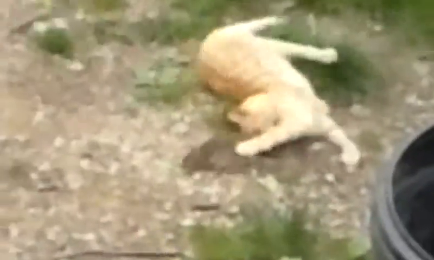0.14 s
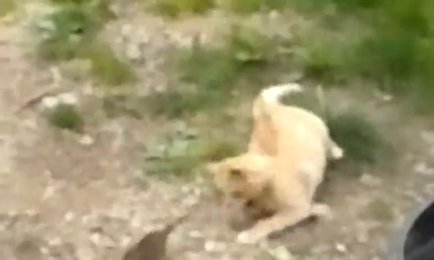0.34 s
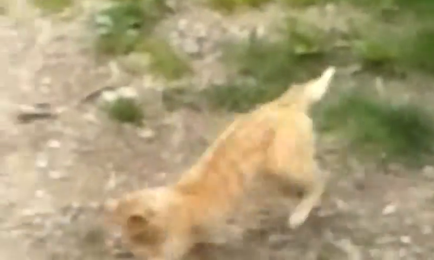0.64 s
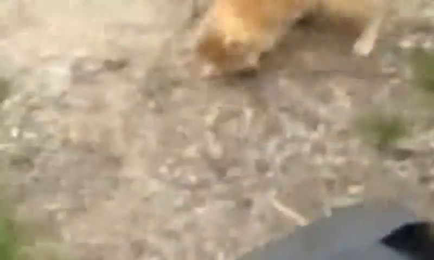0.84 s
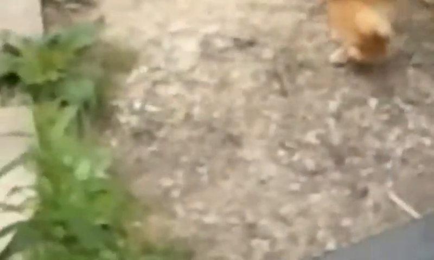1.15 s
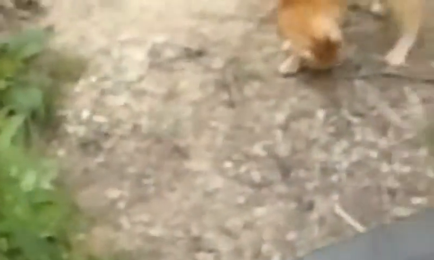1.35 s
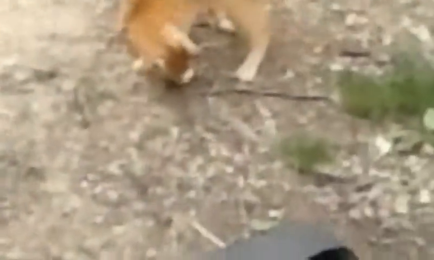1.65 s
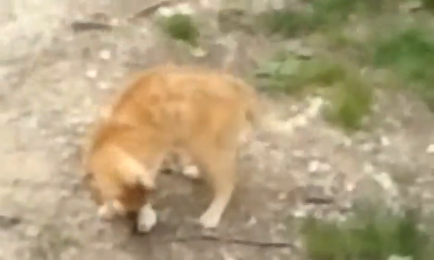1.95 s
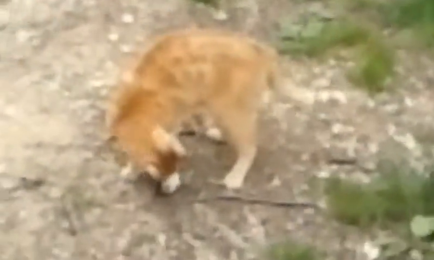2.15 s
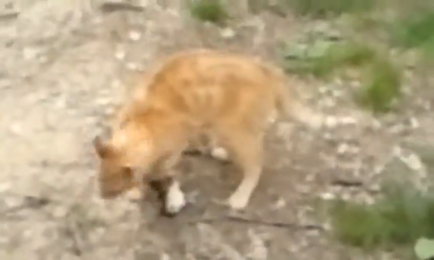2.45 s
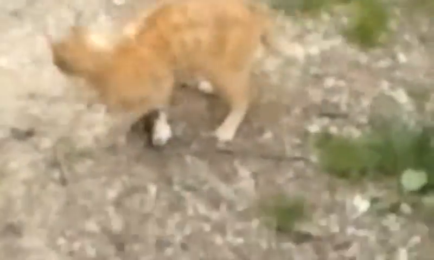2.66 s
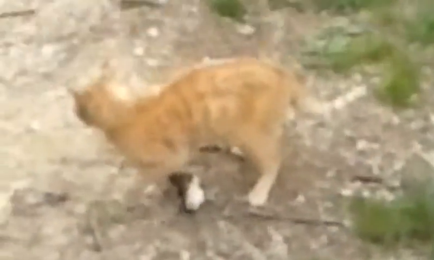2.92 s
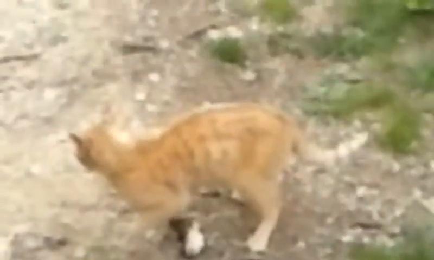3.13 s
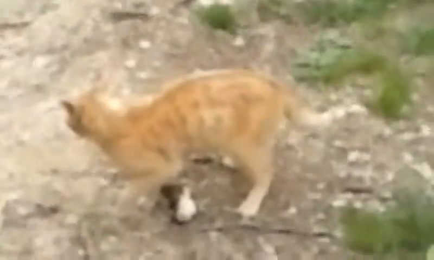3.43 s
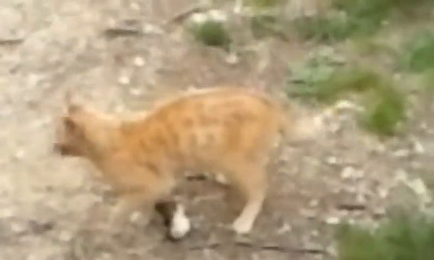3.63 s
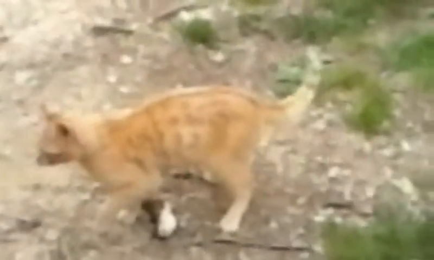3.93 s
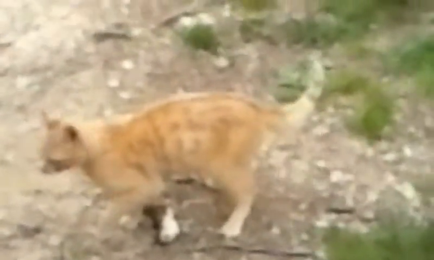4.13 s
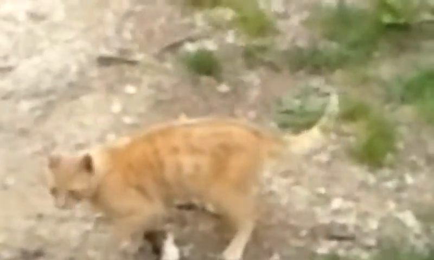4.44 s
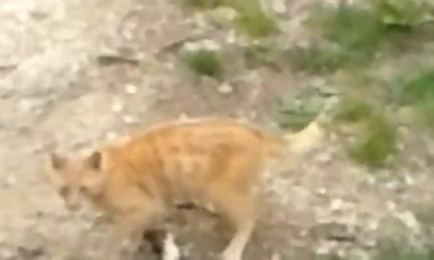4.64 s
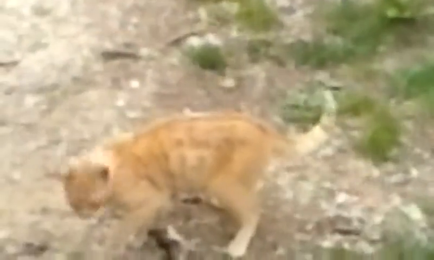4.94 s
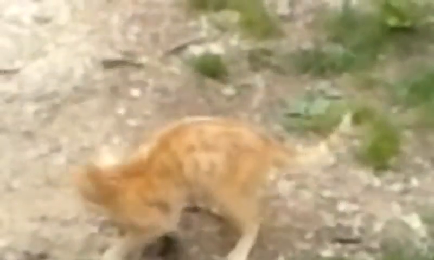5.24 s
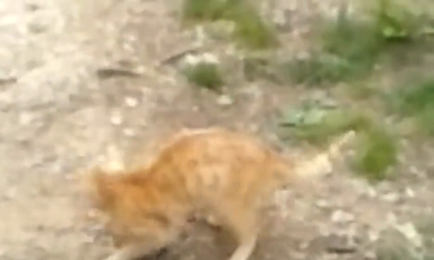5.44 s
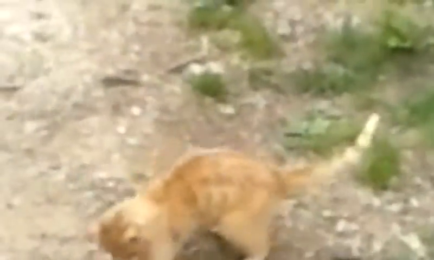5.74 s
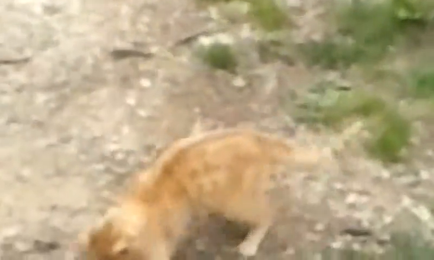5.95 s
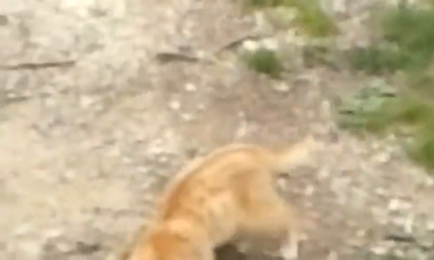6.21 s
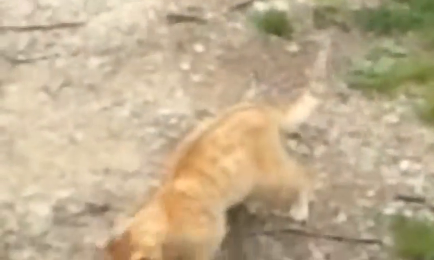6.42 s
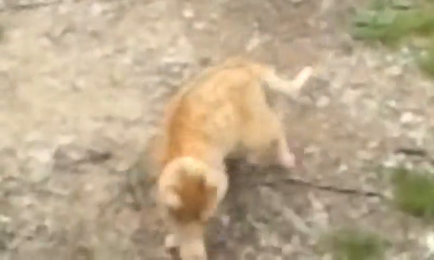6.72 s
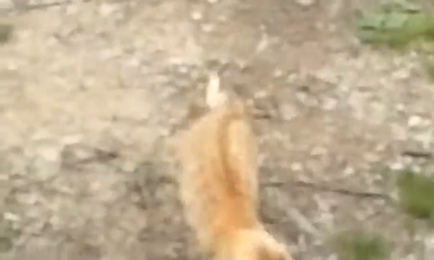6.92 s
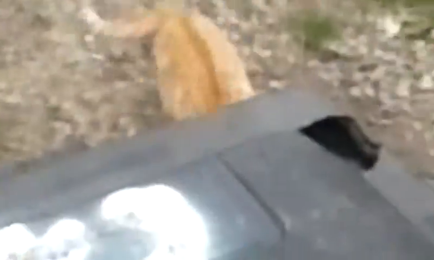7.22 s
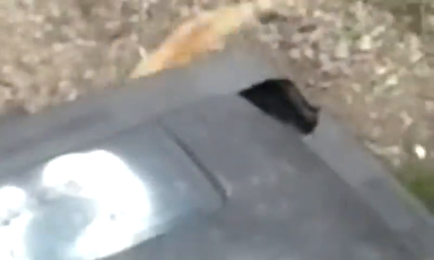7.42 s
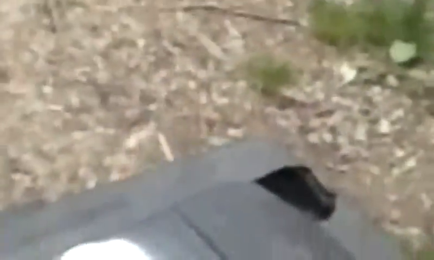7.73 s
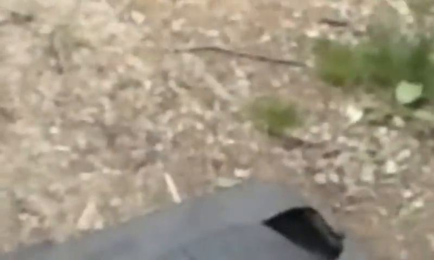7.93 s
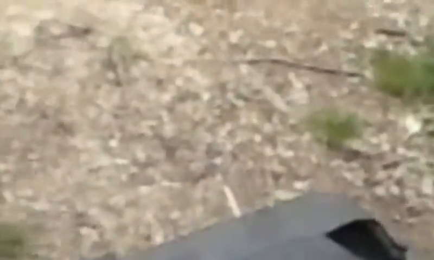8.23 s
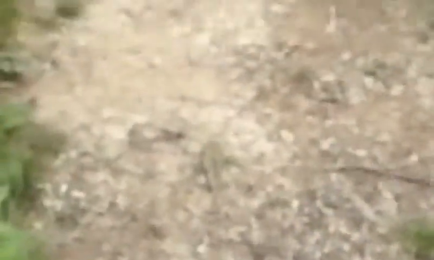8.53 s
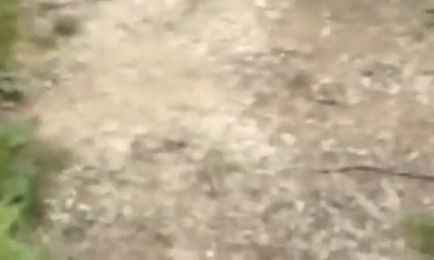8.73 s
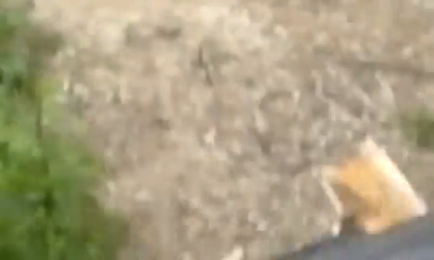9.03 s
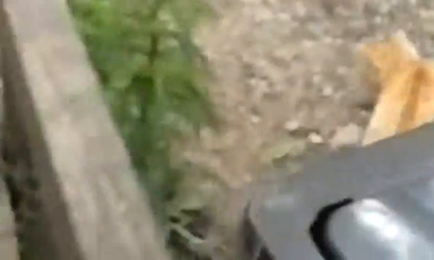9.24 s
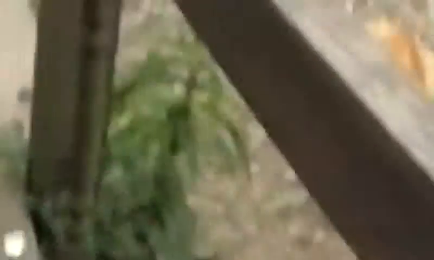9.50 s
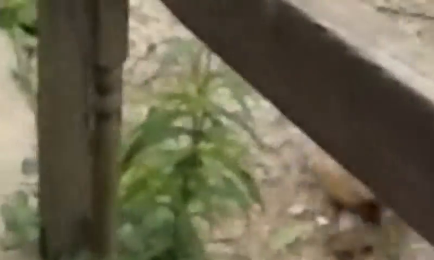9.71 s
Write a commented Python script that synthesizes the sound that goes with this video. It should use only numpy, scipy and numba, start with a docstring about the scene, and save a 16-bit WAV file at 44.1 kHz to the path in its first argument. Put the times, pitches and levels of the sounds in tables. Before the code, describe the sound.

A summer back yard heard through a hand-held phone, the same in both channels. A high, raspy insect drone around 7 kHz runs throughout, swelling and dipping, over faint leaf hiss, low rumble and far traffic hum. From 0.1 to 1.3 s short bird whistles slide mostly downward, with a thin high call at 0.6 and a soft bump. Soft rising whistles begin at 1.6, becoming fuller from 2.8 to 5 s, about six a second, with low arching whistles beneath. A small thump lands at 2.9. From 5.2 to 6 s a bright chipping trill grows loud, with a thin squeak at 5.6. Sparse hoarse and thin calls follow around 7 s, with faint rustling. Sharp clicks and a strong short thud hit near 7.5. Dry rubs come at 8.3 and 8.8, clustered knocks at 9.0-9.3 amid brief whistles, then rapid clicks near 9.5 as insects and hum continue.

```python
"""A summer back yard heard through a hand-held phone, over insects that swell and sink and a far traffic hum.
It opens with sliding bird whistles and a thin call; then rising and low arching whistles go on to about 5 s.
A swelling trill and a high squeak follow before 6 s. A bump with clicks comes near 7.5 s, more of both after 9 s,
and dry rustles now and then. Insects, rubs and wind-like washes are shaped noise; birds and hums are
sine tones with moving pitch; bumps are fading sine tones."""
import sys
import numpy as np
from scipy import signal
from scipy.fft import rfft, irfft, next_fast_len
from scipy.io import wavfile
from scipy.ndimage import uniform_filter1d
from numba import njit

SR = 44100
rng = np.random.default_rng(int(sys.argv[2]) if len(sys.argv) > 2 else 0)


def bounce(signal):
    """Save signal as a 16-bit WAV file at the path given by the first command-line argument."""
    frames = np.transpose(np.atleast_2d(signal))
    limited = np.clip(frames, -1, 1)
    pcm = np.round(limited * 32767).astype(np.int16)
    wavfile.write(sys.argv[1], SR, pcm)


N = 435266
T = np.arange(N) / SR
# Levels in the tables are starting levels: the functions add their own gains and flutter.


def undb(db):
    """Turn decibels into a multiplier."""
    return 10 ** (np.asarray(db) / 20)


def unit(x):
    """Scale to an rms of 1."""
    return x / np.sqrt(np.mean(x ** 2))


def curves(rows):
    """Join each column of a table by straight lines over time."""
    s, *columns = np.transpose(rows)
    return [np.interp(T, s, c) for c in columns]


def add(out, s, x):
    """Mix x into out, starting at s seconds."""
    i = max(int(s * SR), 0)
    out[i:i + len(x)] += x[:max(N - i, 0)]


def colour(x, points):
    """Make some pitches stronger and others weaker, following a table of (frequency [Hz], level [dB])."""
    hz, db = np.transpose(points)
    f = np.fft.rfftfreq(len(x), 1 / SR) + 1  # + 1 keeps the logarithm finite
    gain = undb(np.interp(np.log(f), np.log(hz), db))
    return irfft(rfft(x) * gain, len(x))


def walk(rate):
    """A smooth random wander of rms near 1, with about `rate` fresh random values a second."""
    k = max(int(SR / rate), 2)
    steps = np.repeat(rng.standard_normal(N // k + 1), k)
    return unit(uniform_filter1d(steps, k)[:N])


@njit
def svf(x, hz, width):
    """State-variable band-pass: two linked integrators resonate at a centre that may move."""
    y, b, l = np.empty(len(x)), 0., 0.
    for i in range(len(x)):
        g, k = np.tan(np.pi * hz[i] / SR), width / hz[i]
        v = (b + g * (x[i] - l)) / (1 + g * (g + k))
        b, l, y[i] = 2 * v - b, l + 2 * g * v, k * v
    return y


def band(x, hz, width):
    """Pass x through the same resonance twice, for steep sides; rms 1."""
    hz = np.clip(hz + np.zeros(len(x)), 20, .45 * SR)
    once = svf(x, hz, float(width))
    return unit(svf(once, hz, float(width)))


# How the insect chorus swells and sinks: (time [s], level [dB])
CHORUS_LEVEL = [(0.0, -38.5), (0.96, -38), (1.4, -49), (1.65, -38), (2.94, -41.5), (3.49, -47), (3.6, -41),
                (3.74, -46.5), (4.07, -42), (5.14, -46.5), (5.47, -43.5), (5.94, -51.5), (6.1, -41.5),
                (6.57, -51), (7.56, -36.5), (7.78, -40.5), (8.52, -39.5), (8.99, -32.5), (9.4, -41.5),
                (9.62, -35.5), (9.87, -40)]
# Its changing tone: (time [s], centre of the drone [Hz], extra treble [dB])
CHORUS_TONE = [(0, 7170, 5), (.95, 6700, 7), (1.4, 5870, 5), (1.65, 7380, 1), (2.8, 7300, 4),
               (3.4, 6870, 1.5), (5.8, 6810, 5.5), (6.3, 7020, -1), (9.87, 7740, 0.5)]
# Wide rasp around and above the drone: (frequency [Hz], level [dB])
SIZZLE_COLOUR = [(1000, -9.5), (3000, -0.5), (5000, -11), (6500, 2), (8600, 11), (10000, 2), (12500, -6.5),
                 (16000, -6.5)]


def insects(count=5, pulse_hz=190, width_hz=2100, scatter=0.036, flutter_db=-0.1, treble_db=-11.5):
    """Several insects, each a fast uneven train of rasps into its own resonance, blur into one drone."""
    (level_db,), (hz, bright_db) = curves(CHORUS_LEVEL), curves(CHORUS_TONE)
    drone = 0
    for place in np.linspace(-1, 1, count):
        rate_hz = pulse_hz * (1 + .3 * place + .25 * walk(60))
        phase = np.cumsum(rate_hz) / SR % 1
        # each rasp starts sharply and fades until the next
        rasps = rng.standard_normal(N) * np.exp(-phase) * undb(flutter_db * walk(35))
        drone = drone + band(rasps, hz * (1 + scatter * place), width_hz)
    sizzle_db = treble_db + bright_db + 0.51 * walk(30)
    sizzle = unit(colour(rng.standard_normal(N), SIZZLE_COLOUR)) * undb(sizzle_db)
    return (unit(drone) + sizzle) * undb(level_db + 0.42 + 0.86 * walk(25))


def birds():
    """All the birds near and far, each with its own mix of echoes from the trees."""
    return (trees(sliding_whistles(), wet_db=-9.5, t60_s=0.66, early_db=-5.0)
            + trees(rising_whistles(), wet_db=-6.5, t60_s=0.55, early_db=-2.5)
            + trees(low_whistles(), wet_db=-6.5, t60_s=0.47, early_db=-6)
            + trees(far_calls(), wet_db=-7, t60_s=0.65, early_db=-3.5)
            + trees(trill(), wet_db=-9, t60_s=0.44, early_db=-3.5)
            + trees(twitter(), wet_db=0.5, t60_s=0.34, early_db=-1.0))


def trees(x, wet_db, t60_s, early_db):
    """Trunks and walls return a quick cluster of echoes; foliage scatters a longer tail."""
    t = np.arange(SR) / SR
    tail = rng.standard_normal(SR) * undb(-60 * t / t60_s) * (1 - np.exp(-t / 0.051))
    early = rng.standard_normal(SR) * np.exp(-t / 0.028) * (t > .002)
    tail = undb(wet_db) * tail / np.linalg.norm(tail)
    early = undb(early_db) * early / np.linalg.norm(early)
    return x + signal.fftconvolve(x, tail + early)[:N]


def whistle(hz, gain, waver):
    """A pure bird tone (a sine) whose pitch trembles at random."""
    tremble = unit(uniform_filter1d(rng.standard_normal(len(hz)), size=60))
    return gain * np.sin(2 * np.pi * np.cumsum(hz * (1 + waver * tremble)) / SR)


def song(notes, gain_db, waver, swell):
    """Each note glides along an arc through its three pitches while it swells and fades."""
    out = np.zeros(N)
    for s, length, start, middle, end, db in notes:
        u = np.linspace(0, 1, int(length * SR))
        hz = np.polyval(np.polyfit([0, .5, 1], [start, middle, end], 2), u)
        gain = undb(db + gain_db) * np.abs(np.sin(np.pi * u)) ** swell
        add(out, s, whistle(hz, gain, waver))
    return out


def repeat(notes, shape, gain_db, waver, rasp, flutter_db):
    """One syllable sung at varying pace; its level flutters and high pitch ratios can tremble more."""
    out, flutter = np.zeros(N), undb(flutter_db * walk(90))
    when, ratio, shape_db = np.transpose(shape)
    paces = 1 + .1 * rng.standard_normal(len(notes))
    for (s, db, hz), pace in zip(notes, paces):
        t = np.arange(when[0], when[-1], pace / SR)
        pitch = np.interp(t, when, ratio)
        gain = undb(db + gain_db + np.interp(t, when, shape_db))
        roughness = waver + rasp * np.maximum(pitch - 1, 0)
        add(out, s + when[0] / pace, whistle(hz * pitch, gain, roughness))
    return out * flutter


# Sliding notes: (time [s], length [s], start pitch [Hz], middle pitch [Hz], end pitch [Hz], level [dB])
SLIDING_NOTES = [(0.102, 0.081, 2690, 2400, 2310, -33), (0.274, 0.079, 2880, 2355, 2540, -32),
                 (0.445, 0.07, 3050, 2348, 2410, -29.5), (0.688, 0.11, 3450, 2840, 2793, -27.5),
                 (1.195, 0.068, 2860, 2830, 2990, -40.5), (1.297, 0.071, 2305, 2192, 1940, -35),
                 (7.722, 0.083, 3200, 3280, 3390, -46.5), (9.07, 0.054, 3055, 3165, 3310, -38),
                 (9.181, 0.084, 3490, 3475, 3340, -41), (9.637, 0.081, 2880, 2710, 2840, -40),
                 (9.735, 0.037, 2770, 2694, 2600, -41)]


def sliding_whistles():
    """Short whistles that slide in pitch, each a sine that swells once."""
    return song(SLIDING_NOTES, gain_db=-1.0, waver=0.0069, swell=1.17)


# Runs of rising whistles, soft and then full: (first note [s], end [s], first gap [s], level [dB])
RISING_RUNS = [(1.642, 2.72, .1685, -48), (2.846, 5.05, .1572, -35.5)]
# Starting pitch, its sag within a run, and how much shorter each gap is than the last
RISING_HZ, RISING_SAG_HZ_PER_S, QUICKEN_S = 2850, 54.7, .00078


def rising_notes():
    """List the notes (time [s], level [dB], pitch [Hz]): each run quickens evenly while its pitch sags."""
    notes = []
    for first, end, gap, db in RISING_RUNS:
        s = first
        while s < end and gap > 0:
            notes.append((s, db, RISING_HZ - RISING_SAG_HZ_PER_S * (s - first)))
            s, gap = s + gap - QUICKEN_S / 2, gap - QUICKEN_S
    return notes


# One rising whistle, level then a steep flick: (time from its loudest point [s], pitch ratio, level [dB])
RISING_SHAPE = [(-.04, .95, -30), (-.022, .96, -11.5), (-.008, .985, -4.5), (0, 1.01, 2),
                (.006, 1.07, -5.5), (.013, 1.17, -4), (.021, 1.23, -13), (.03, 1.36, -19)]


def rising_whistles():
    """A whistle flicks upward again and again, its tone rougher at the top."""
    return repeat(rising_notes(), RISING_SHAPE, gain_db=-3, waver=0.021, rasp=0.2, flutter_db=2.4)


# Low arching whistles: (time [s], level [dB], pitch [Hz])
LOW_NOTES = [(1.785, -46.5, 1900), (3.058, -47, 1970), (3.368, -44, 1980), (3.703, -42, 2034),
             (4.035, -43.5, 1970), (4.378, -51.5, 1934), (4.71, -45.5, 1940), (5.072, -46.5, 1943)]
# One low whistle: (time from its loudest point [s], pitch ratio, level [dB])
LOW_SHAPE = [(-.045, .88, -16), (-.018, 0.96, -5.5), (0, 0.99, 1.5), (.016, .995, -8.5), (.036, .95, -7),
             (.06, .89, -11.5)]
# One drawn-out note: (time [s], length [s], start pitch [Hz], middle pitch [Hz], end pitch [Hz], level [dB])
LONG_NOTE = [(2.5, 0.21, 1700, 1890, 1945, -43)]


def low_whistles():
    """A low tone arches up and down, repeated, with one drawn-out rising note among them."""
    arches = repeat(LOW_NOTES, LOW_SHAPE, gain_db=0.0, waver=0.014, rasp=0, flutter_db=3.5)
    return arches + song(LONG_NOTE, gain_db=0, waver=0.013, swell=0.71)


# Thin high calls: (time [s], level [dB], pitch [Hz])
THIN_NOTES = [(.557, -38, 6450), (3.934, -36, 6330), (7.263, -39.5, 6080)]
# One thin call: (time from its start [s], pitch ratio, level [dB])
THIN_SHAPE = [(0, .94, -10), (.03, .955, 2), (.08, .98, -1.5), (.25, 1.015, -5.5), (.32, .98, -3),
              (.38, .93, -6)]
# Hoarse calls: (time [s], length [s], start pitch [Hz], middle pitch [Hz], end pitch [Hz], level [dB])
HOARSE_NOTES = [(1.74, 0.049, 4690, 4400, 4200, -43.5), (1.804, 0.036, 2990, 3570, 3910, -41.5),
                (7.002, 0.083, 4600, 4390, 4440, -40.5), (7.113, 0.059, 4950, 5260, 5500, -39),
                (8.353, 0.064, 4650, 4380, 4360, -42), (8.409, 0.077, 2450, 2310, 2374, -48.5)]


def far_calls():
    """Thin high calls bend slowly; hoarse ones tremble more in pitch."""
    thin = repeat(THIN_NOTES, THIN_SHAPE, gain_db=-4.0, waver=0.0136, rasp=0, flutter_db=4.5)
    return thin + song(HOARSE_NOTES, gain_db=-3.5, waver=0.031, swell=0.49)


# Chips of the swelling trill: (time [s], level [dB], pitch [Hz])
TRILL_CHIPS = [(5.1828, -31, 3970), (5.325, -31, 4010), (5.4487, -23.5, 4320), (5.5806, -20, 4380),
               (5.708, -17.5, 4436), (5.832, -17, 4480), (5.9586, -15.5, 4460)]
# One chip: (time from its loudest point [s], pitch ratio, level [dB])
CHIP_SHAPE = [(-.018, 1.16, -23), (-.011, 1.14, -16), (-.006, 1.06, -16), (-.002, 1.025, -11),
              (.002, 1.005, 0), (.005, .99, -2.5), (.009, .975, -17), (0.017, .96, -8), (0.027, .94, -19)]
# The other side of the voice box buzzes above each chip; pitch and level against the chip's
BUZZ_LEAD_S, BUZZ_S, BUZZ_RATIO, BUZZ_FALL, BUZZ_DB = 0.017, .045, 1.175, 0.026, -16.5
# A soft down-flick answers each chip; level against the chip's, pitches at start, middle and end
FLICK_LAG_S, FLICK_S, FLICK_DB, FLICK_HZ = .061, 0.014, -19, (3700, 3297, 2450)


def trill():
    """Each chip carries a buzz above it and is followed by a down-flick; both grow with the chip."""
    buzzes, flicks = [], []
    fall = BUZZ_RATIO * (1 + BUZZ_FALL * np.array([1, 0, -1]))
    for s, db, hz in TRILL_CHIPS:
        buzzes.append((s - BUZZ_LEAD_S, BUZZ_S, *(hz * fall), db + BUZZ_DB))
        flicks.append((s + FLICK_LAG_S, FLICK_S, *FLICK_HZ, db + FLICK_DB))
    chips = repeat(TRILL_CHIPS, CHIP_SHAPE, gain_db=-2.5, waver=.019, rasp=.25, flutter_db=.8)
    return (chips + song(flicks, gain_db=-1, waver=0.04, swell=0.21)
            + song(buzzes, gain_db=-2.0, waver=0.044, swell=0.79))


def twitter(count=110, level_db=-57.5, spread_db=3):
    """Many faint short notes at random times, each sliding up or down: birds all around."""
    notes = []
    for a, b, c, d, e in rng.random((count, 5)):
        slide = 1 + 0.39 * (d - .5) * np.array([-1, 0, 1])
        hz = (2700 + 2400 * c) * slide
        notes.append((a * N / SR, 0.0204 + .05 * b, *hz, level_db + spread_db * (2 * e - 1)))
    return song(notes, gain_db=0, waver=0.021, swell=0.79)


# Three partials: (time [s], length [s], start pitch [Hz], middle pitch [Hz], end pitch [Hz], level [dB])
SQUEAK_PARTIALS = [(5.585, .1, 11520, 11400, 11200, -53), (5.585, .1, 12960, 12960, 12940, -58),
                   (5.585, .1, 14400, 14400, 14380, -63)]


def squeak():
    """A thin high squeak: three sine tones sound together and slip slightly down."""
    return song(SQUEAK_PARTIALS, gain_db=2, waver=.003, swell=.4)


# Bumps: (time [s], thud level [dB], thud pitch [Hz], time the thud takes to fall 60 dB [s],
# ring level against the thud [dB])
BUMPS = [(.66, -32.5, 200, 0.051, -8), (0.681, -36, 190, 0.054, -2), (2.876, -24.5, 134, 0.048, -16),
         (5.305, -30, 190, 0.12, 1), (7.48, -11.5, 190, 0.013, -14), (9.016, -22, 596, 0.039, -28),
         (9.023, -23, 544, 0.046, -11), (9.051, -20, 185, 0.035, -9), (9.06, -26.5, 343, .05, 4.5),
         (9.104, -33, 370, .09, 3), (9.16, -29.5, 160, 0.057, 3), (9.29, -36, 129, 0.055, 5)]
GRIP_HZ, GRIP_T60_S = 96, 0.13


def bumps():
    """A soft push on the phone: a fading thud together with the low ring of the grip."""
    out, t = np.zeros(N), np.arange(SR // 2) / SR
    for s, db, hz, t60, ring_db in BUMPS:
        thud = np.sin(2 * np.pi * hz * t) * undb(-60 * t / t60)
        ring = np.sin(2 * np.pi * GRIP_HZ * t) * undb(ring_db - 60 * t / GRIP_T60_S)
        add(out, s, undb(db) * (thud + ring))
    return out


# Sharp clicks: (time [s], peak level [dB])
CLICKS = [(7.464, -25), (7.4736, -15), (9.442, -19), (9.4695, -23), (9.4832, -21), (9.487, -23),
          (9.505, -19)]
# Tone of a click: (frequency [Hz], level [dB])
CLICK_COLOUR = [(200, 2), (900, 2.5), (2500, -2.5), (5000, -16), (8000, 5.5), (11000, -6.5), (16000, -9)]


def clicks(decay_s=0.001):
    """Tiny hard ticks of the case under the fingers: bursts of noise that die at once."""
    out, t = np.zeros(N), np.arange(512) / SR
    for s, db in CLICKS:
        tick = colour(rng.standard_normal(len(t)), CLICK_COLOUR) * np.exp(-t / decay_s)
        add(out, s, undb(db) * tick / np.abs(tick).max())
    return out


# Scuffs, rustles and one brief high tick: (time [s], length [s], level [dB], centre [Hz], width [Hz])
SCUFFS = [(0.637, 0.09, -49, 200, 300), (1.935, 0.34, -57, 258.6, 300), (2.21, 0.037, -50.5, 1750, 900),
          (2.874, 0.019, -35, 10100, 9000), (2.88, 0.037, -39, 8450, 5000), (3.57, 0.06, -40, 7500, 3000),
          (5.307, 0.16, -48, 200, 179), (5.433, .007, -32, 6200, 2500), (7.07, 0.17, -51.5, 3270, 1800),
          (7.2, 0.39, -53.5, 2450, 1800), (7.479, .02, -43, 10500, 7000), (8.29, 0.05, -45.5, 483, 120),
          (8.303, 0.51, -59, 2930, 1800), (8.741, 0.18, -45, 3000, 3030), (8.814, 0.15, -44, 4450, 1800),
          (9.011, 0.012, -28, 7200, 3000), (9.009, 0.029, -40, 1497, 2500), (9.037, 0.14, -40.5, 198, 350),
          (9.058, 0.02, -31, 7800, 500), (9.428, 0.09, -53, 2600, 3000)]


def scuffs(grain_db=3):
    """Rubs and dry rustles: grainy friction noise that starts fast and trails away; the narrow row near 7.8 kHz
    is a brief high tick in the insects' band."""
    out, grain = np.zeros(N), rng.standard_normal(N) * undb(grain_db * walk(400))
    for s, length, db, hz, width in SCUFFS:
        u = np.linspace(0, 1, int(length * SR))
        rub = band(grain[int(s * SR):][:len(u)], hz, width)
        fade = unit(np.sqrt(u) * (1 - u))
        add(out, s, undb(db) * rub * fade[:len(rub)])
    return out


def background():
    """Everything far off: low rumble, traffic wash, hiss in the leaves, singing tyres and two hums."""
    return rumble() + traffic_wash() + leaf_hiss() + tyres() + hums()


# Tone of the rumble: (frequency [Hz], level [dB])
RUMBLE_COLOUR = [(20, -34), (35, -27), (52, -0.5), (85, 7), (130, -1), (220, -7.5), (400, -20), (1000, -50)]
# Its loudness: (time [s], level [dB])
RUMBLE_LEVEL = [(0.0, -69), (1.37, -65), (2.2, -72), (2.89, -59), (4.81, -66.5), (7.69, -55.5),
                (8.0, -60.5), (9.87, -58)]


def rumble(gain_db=11):
    """Deep noise whose level wanders."""
    (level_db,) = curves(RUMBLE_LEVEL)
    noise = unit(colour(rng.standard_normal(N), RUMBLE_COLOUR))
    return noise * undb(level_db + gain_db + 1.7 * walk(7))


def restless(points, flicker_db, rate):
    """Coloured noise in half-octave bands that swell and sink on their own; the top stays smooth."""
    spectrum = rfft(colour(rng.standard_normal(next_fast_len(N)), points))
    hz = np.linspace(0, SR / 2, len(spectrum))
    place = 2 * np.log2(np.clip(hz, 250, 8000) / 250)  # in half octaves above 250 Hz
    depths = flicker_db * np.minimum(np.linspace(2, 0, 11), 1)
    total = 0
    for k, depth in enumerate(depths):
        share = np.sqrt(np.maximum(1 - np.abs(place - k), 0))  # neighbouring bands overlap
        total = total + irfft(spectrum * share)[:N] * undb(depth * walk(rate))
    return unit(total)


# Tone of the traffic wash: (frequency [Hz], level [dB])
WASH_COLOUR = [(150, 3.5), (250, 0), (380, 2.5), (490, -3), (580, 1), (760, 2), (1100, -5.5), (1600, -9.5),
               (2400, -16), (8000, -48)]
# Its loudness: (time [s], level [dB])
WASH_LEVEL = [(0.0, -56.5), (1.07, -50.5), (2.8, -55), (4.64, -56), (7.06, -48.5), (8.03, -49),
              (8.41, -44.5), (9.87, -52)]


def traffic_wash(gain_db=1.0):
    """Far traffic blurs into soft noise that flickers band by band."""
    (level_db,) = curves(WASH_LEVEL)
    return restless(WASH_COLOUR, flicker_db=3.5, rate=16) * undb(level_db + gain_db)


# Tone of the leaf hiss: (frequency [Hz], level [dB])
LEAF_COLOUR = [(100, 5.5), (900, -5.5), (1600, 0), (2400, -1), (3300, -4), (4500, -0.5), (6000, 3.5),
               (10000, -1), (16000, -7)]


def leaf_hiss(level_db=-53.5):
    """Faint hiss in the leaves: noise whose bands slowly flicker."""
    return restless(LEAF_COLOUR, flicker_db=5.5, rate=6) * undb(level_db)


# Far tyres singing on the road: (time [s], pitch [Hz], level [dB])
TYRES = [(0, 964, -60.5), (3, 930, -68.5), (6.2, 700, -61.5), (8.8, 776, -52), (9.87, 923, -50)]


def tyres(width_hz=190):
    """Noise through a narrow, wandering resonance sings like tyres on a road."""
    hz, level_db = curves(TYRES)
    wandering_hz = hz * (1 + 0.036 * walk(8))
    return band(rng.standard_normal(N), wandering_hz, width_hz) * undb(level_db + 2 * walk(10))


# Loudness of a far engine: (time [s], level [dB])
ENGINE_LEVEL = [(0.0, -65), (1.35, -67), (2.36, -66), (2.97, -49), (4.45, -49), (5.06, -61), (6.13, -53),
                (7.23, -57), (7.39, -49), (9.02, -51), (9.18, -41), (9.87, -50)]
# Its pitch, following its speed: (time [s], pitch [Hz])
ENGINE_PITCH = [(1.4, 83.05), (4.6, 101.3), (5.6, 92), (9.87, 89)]
# Loudness of a second hum with a steadier pitch: (time [s], level [dB])
HUM_LEVEL = [(0, -73.5), (7, -50), (8.2, -58), (9.87, -55.5)]
HUM_HZ = 126.6  # centre of its wavering pitch


def wavering_hum(hz, level_db):
    """A sine whose pitch and loudness waver by chance."""
    phase = 2 * np.pi * np.cumsum(hz * (1 + 0.0489 * walk(25))) / SR
    return np.sqrt(2) * undb(level_db + 2.65 * walk(14)) * np.sin(phase)


def hums(engine_gain_db=-1):
    """A far engine that changes pitch, and a second hum around one pitch."""
    (engine_hz,), (engine_db,), (hum_db,) = curves(ENGINE_PITCH), curves(ENGINE_LEVEL), curves(HUM_LEVEL)
    return wavering_hum(engine_hz, engine_db + engine_gain_db) + wavering_hum(HUM_HZ, hum_db)


def scene():
    """Everything reaches one microphone, so both channels are alike."""
    mono = insects() + birds() + squeak() + bumps() + clicks() + scuffs() + background()
    return np.array([mono, mono])


def record(dry, bass_hz=42, top_hz=15800):
    """The phone drops the deepest bass and cuts the top."""
    thin = signal.sosfilt(signal.butter(4, bass_hz, "high", fs=SR, output="sos"), dry)
    return signal.sosfilt(signal.ellip(10, .2, 70, top_hz, fs=SR, output="sos"), thin)


dry = scene()
out = record(dry)
bounce(out)
```